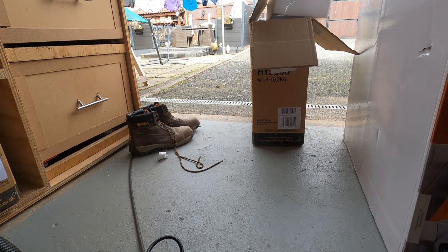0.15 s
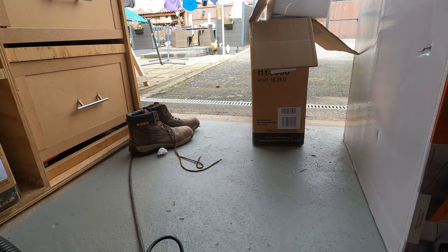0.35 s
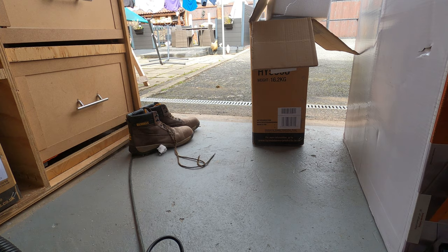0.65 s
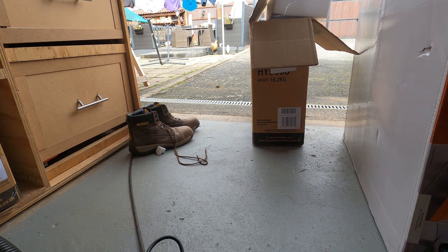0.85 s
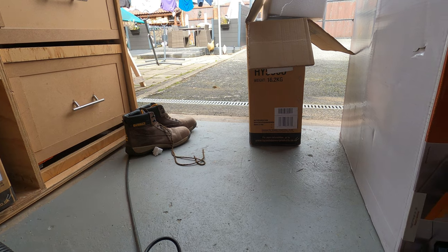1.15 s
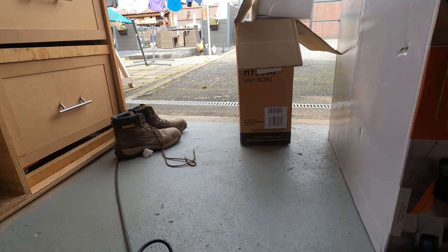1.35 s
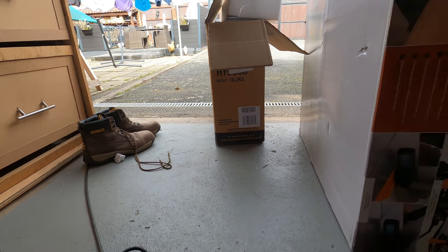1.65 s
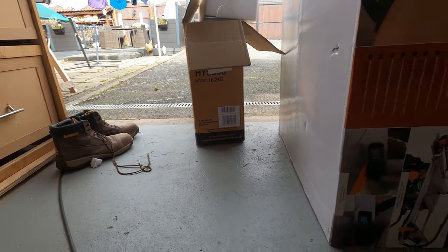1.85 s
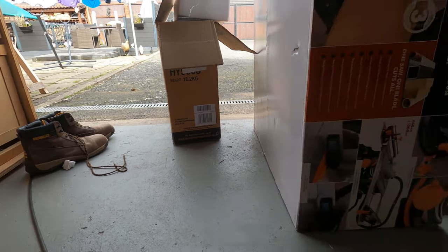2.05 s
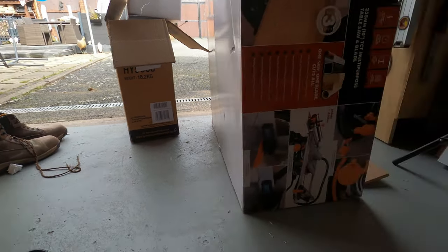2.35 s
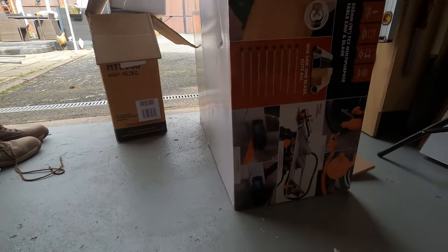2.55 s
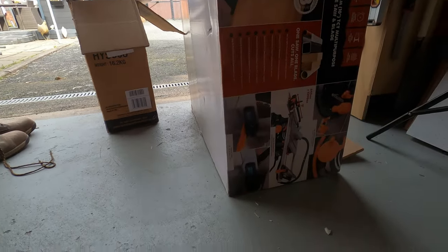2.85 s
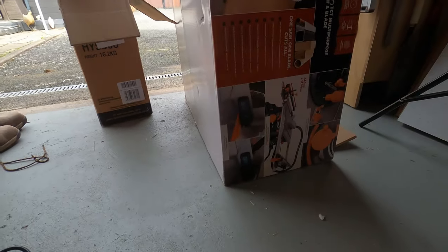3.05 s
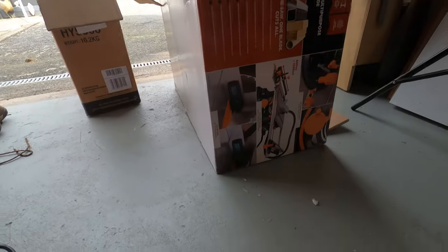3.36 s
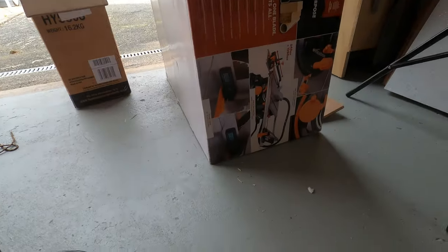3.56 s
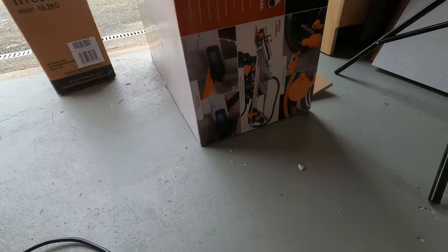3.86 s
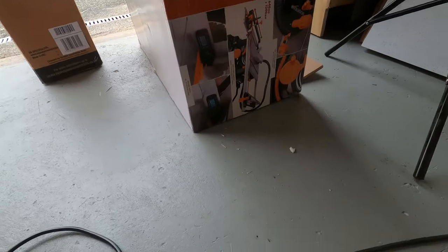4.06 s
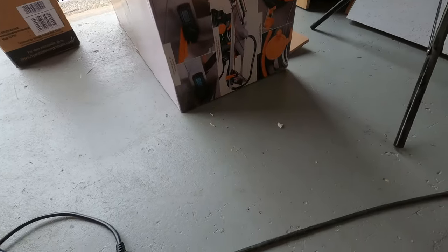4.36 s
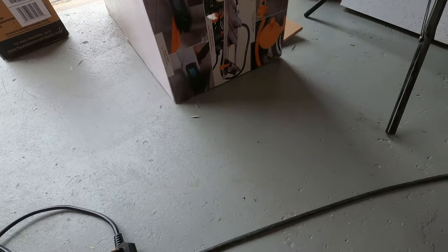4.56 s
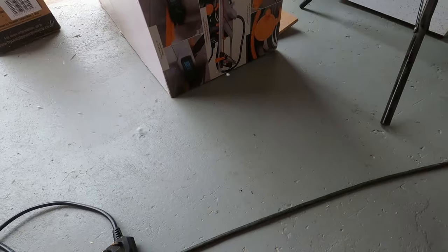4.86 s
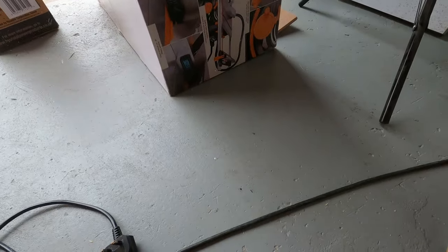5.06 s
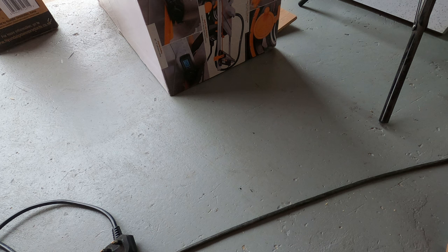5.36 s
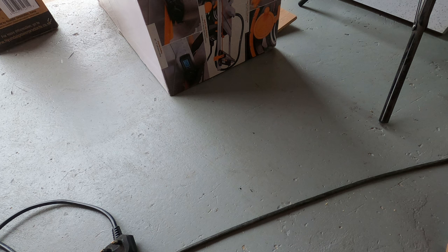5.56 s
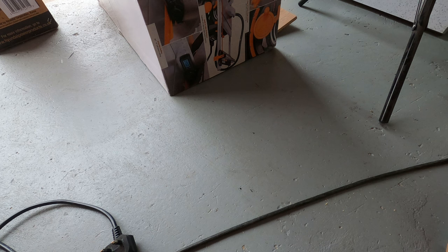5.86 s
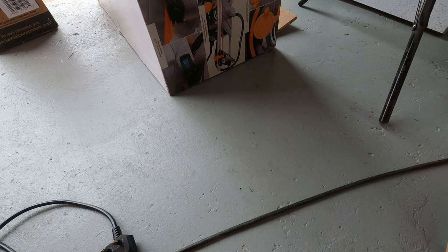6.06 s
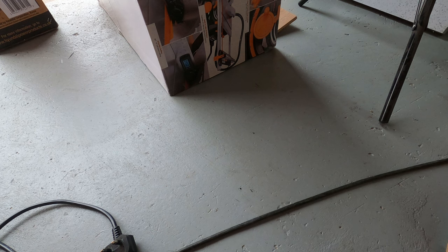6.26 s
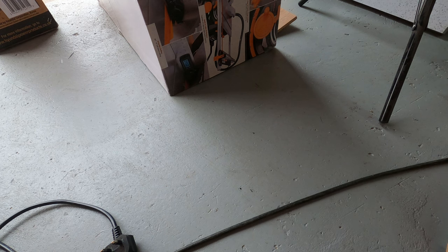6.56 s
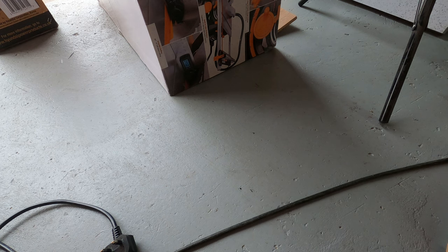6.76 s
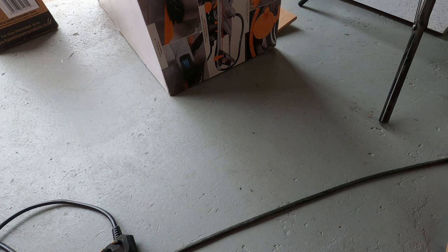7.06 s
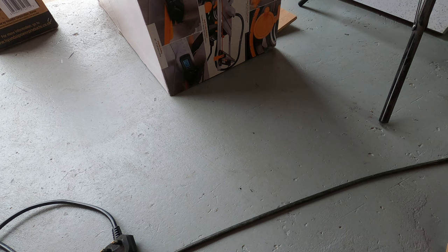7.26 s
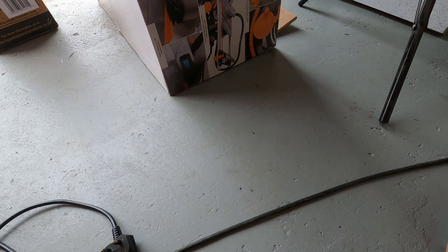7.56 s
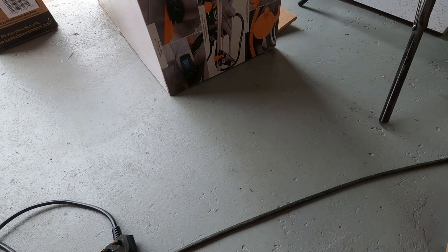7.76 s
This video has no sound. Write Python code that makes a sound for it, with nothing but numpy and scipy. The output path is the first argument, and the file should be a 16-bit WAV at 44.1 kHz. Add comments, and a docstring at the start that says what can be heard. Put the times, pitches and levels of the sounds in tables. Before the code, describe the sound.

A belt-driven air compressor runs continuously in a garage, a low steady hum with a gentle fast throb, buzzing pump strokes and faint metallic clatter. At about 0.1, 0.65 and 0.95 seconds, three bright air-gun blasts of under a fifth of a second hiss close by, each opening with a surge and buffeting the microphone; their thin top leans right. Around 2.3 to 2.6 seconds the microphone turns towards the machine, with a swelling low rumble and a cluster of small handling clicks, and the hum becomes clearly louder. The motor drones alone, with one tiny click near 3.9, until 4.7 seconds. Then come ten crisp short hisses, at roughly 4.7, 4.9, 5.5, 5.7, 6.25, 6.5, 6.9, 7.2, 7.4 and 7.6, with less buffeting and a little more room echo. The low-middle tank resonance slowly recedes. The hum continues to the end.

```python
"""Three short blasts of an air gun pass close to the microphone and buffet it, over the hum and throb of a
belt-driven air compressor in a garage. The microphone then turns towards the machine with a rumble and
handling clicks, the hum grows, and ten more blasts follow. The motor and pump strokes are sums of harmonics;
the clatter, jet and moving air are shaped noise; the clicks are short rings. A diffuse tail is the garage."""
import sys
import numpy as np
from scipy import signal
from scipy.fft import rfft, irfft
from scipy.io import wavfile
from scipy.ndimage import map_coordinates

SR = 44100
rng = np.random.default_rng(int(sys.argv[2]) if len(sys.argv) > 2 else 0)


def output_pcm(signal):
    """Save a mono or channel-first signal as 16-bit PCM at the path in sys.argv[1].

    Samples are clipped to [-1, 1] before scaling.
    """
    pcm = np.clip(np.atleast_2d(signal).T, -1, 1) * 32767
    wavfile.write(sys.argv[1], SR, np.round(pcm).astype(np.int16))


N = 348831
T = np.arange(N) / SR

BELT_HZ = 4.7525  # turns of the belt per second
PUMP_HZ, MOTOR_HZ = 5 * BELT_HZ, 10 * BELT_HZ  # pump strokes and motor turns per second
TURN_S = 2.41  # the microphone turns from the nearby nozzle to the machine
# Harmonics of the motor's hum: multiple of its turning rate, relative level/dB
MOTOR_TONES = [(1, -13), (2, 1.5), (3, -6.5), (4, -13.5), (5, -18), (6, -33), (7, -26.5), (8, -32),
               (9, -26.5), (10, -24), (11, -32), (12, -27)]


def amp(db):
    """Gain for a level in dB."""
    return 10 ** (np.asarray(db) / 20)


def unit(x):
    """The signal scaled to rms 1."""
    return x / np.sqrt(np.mean(x ** 2) + 1e-20)


def read(points, hz):
    """A table's value at hz, on a log-frequency axis."""
    f, value = np.transpose(points)
    return np.interp(np.log(hz + 1), np.log(f + 1), value)


def lift(resonances, hz):
    """dB that a set of resonances adds at hz."""
    return sum(db / (1 + (2 * (hz - f) / width) ** 2) for f, width, db in resonances)


def bins(size):
    """Frequencies in Hz of a real spectrum."""
    return np.fft.rfftfreq(size, 1 / SR)


def noise(spectrum, size, extra_db=0):
    """Noise of rms 1 with the given spectrum."""
    shape = amp(read(spectrum, bins(size)) + extra_db)
    return unit(irfft(rfft(rng.standard_normal(size)) * shape, size))


def drift(rate_hz, size):
    """Random wander of rms 1, no faster than about rate_hz."""
    shape = np.exp(-(bins(size) / rate_hz) ** 2)
    return unit(irfft(rfft(rng.standard_normal(size)) * shape, size))


def add(mix, s, sound):
    """Lay a sound into the mix from time s, cut off at the mix's end."""
    part = mix[round(s * SR):][:len(sound)]
    part += sound[:len(part)]


def garage(x, delay_s=0.0053):
    """The room's diffuse tail: noise that starts after a short gap, each band dying at its own speed."""
    # Reverberation of the garage: f/Hz, time to fall 60 dB/s
    decay_times = [(200, 0.4), (1500, 0.27), (4000, 0.29), (8000, 0.31), (15000, 0.22)]
    hz, t, z = signal.stft(rng.standard_normal(SR * 3 // 4), SR, nperseg=256)
    decay = amp(-60 * t / read(decay_times, hz)[:, None])
    tail = signal.istft(z * decay, SR, nperseg=256)[1]
    tail *= np.arange(len(tail)) > delay_s * SR
    return signal.fftconvolve(x, tail / np.linalg.norm(tail))[:N]


def nearness(hz):
    """Gain over time of the machine's sound at one frequency; the low middle comes from the tank."""
    # How near the machine is to the microphone: t/s, level/dB
    distance_levels = [(0.1, -4.5), (1.3, -7.5), (2.05, -2.5), (2.6, 3), (4.5, 1.14), (6.2, 0.66),
                       (7.0, -2.5), (7.8, 0)]
    # the tank stands out at first, then sinks as the microphone is lowered to the floor
    tank_db, sink_db, sink_from_s, sink_s = 1, 8.5, 4.22, 1.94
    sunk = 1 - np.exp(-np.maximum(T - sink_from_s, 0) / sink_s)
    tank_share = np.interp(np.log(hz), np.log([100, 400, 900]), [0, 1, 0])
    machine_db = np.interp(T, *np.transpose(distance_levels))
    return amp(machine_db + tank_share * (tank_db - sink_db * sunk))


def clatter(level_db=-49, stroke_depth=0.056, patter=0.089):
    """Valves and cooling air: noise rippling at multiples of the stroke rate, ringing in tank and pump head."""
    # Noise of the machine: f/Hz, relative level per Hz/dB
    clatter_spectrum = [(15, -42), (25, -19), (43, -20), (79, -8), (107, -3.5), (215, -15.5), (274, -25),
                        (421, -20), (567, -30), (631, -29), (895, -30.5), (1530, -34.5), (4380, -43),
                        (11800, -54.5), (15500, -69)]
    # Ringing of the tank and pump head: f/Hz, width/Hz, lift/dB
    shell = [(321, 42, 7.5), (394, 45, 4), (1020, 380, 4), (1346, 56, 8), (1760, 91, 4.5),
             (3020, 1600, 3.5), (4300, 540, 5), (7450, 260, 5.5), (9200, 450, 3.5)]
    hz = bins(N)
    strokes = sum(np.cos(2 * np.pi * (k * PUMP_HZ * T + rng.random())) for k in range(3, 7))
    swell = 1 + stroke_depth * strokes + patter * drift(27, N)
    z = rfft(noise(clatter_spectrum, N, lift(shell, hz)) * swell)
    z /= np.std(irfft(z * (hz > 1200), N))  # the level is that of the part above 1200 Hz
    # three overlapping bands, each with its own nearness
    centres = [100, 400, 900]
    bands = [irfft(z * np.interp(hz, centres, row), N) * nearness(f) for f, row in zip(centres, np.eye(3))]
    return amp(level_db) * sum(bands)


def hum(level_db=-27, waver=0.1, slip_s=.00008):
    """The motor's harmonics; the belt's uneven pull sets side tones beside them, which throb twice a belt turn."""
    # Standing waves of the garage that lift the side tones: f/Hz, width/Hz, lift/dB
    boom = [(104.5, 5.7, 11.5), (199.6, 7.1, 16.5)]
    throb_db, throb_follow = -18.5, 0.41  # the throb deepens as the tank gets louder
    limp_db = -10  # a further side tone makes every other throb stronger
    belt_mark_s = 2.917  # the phases of the tones and side tones are counted from here
    t = T - belt_mark_s + slip_s * drift(2.8, N)
    throb = amp(throb_db) * nearness(400) ** throb_follow
    out = np.zeros(N)
    for multiple, db in MOTOR_TONES:
        hz, start = np.round(multiple) * MOTOR_HZ, rng.random()
        tone = np.cos(2 * np.pi * (hz * t + start))
        for step, share in [(-2, -1), (2, 1), (3, amp(limp_db))]:  # step in belt turns
            side_hz = hz + step * BELT_HZ
            side_tone = np.cos(2 * np.pi * (side_hz * t + start))
            tone += share * throb * amp(lift(boom, side_hz)) * side_tone
        out += amp(level_db + db) * nearness(hz) * (1 + waver * drift(5.6, N)) * tone
    return np.sqrt(2) * out


def buzz(level_db=0, flutter=0.34, slip_s=.00008, count=60):
    """Harmonics of the pump's strokes fill in between and above the motor's tones, each fluttering a little."""
    # Level of the stroke harmonics: f/Hz, level/dB
    buzz_levels = [(70, -69), (120, -45.5), (240, -70), (320, -58), (450, -60), (590, -73), (720, -63),
                   (1020, -58.5), (1130, -74), (1340, -71.5), (2000, -72)]
    # Sharp rings of the casing that pick out single harmonics: f/Hz, width/Hz, lift/dB
    casing = [(309, 12, 6), (760, 12, 4.5), (903, 12, 2.5), (974, 12, 4.5), (1069, 8.8, 10)]
    t = T + slip_s * drift(1.8, N)
    flutters = [drift(4.9, N) for _ in range(7)]
    out = np.zeros(N)
    for k in range(3, count):
        if k % 2 or k > 2 * len(MOTOR_TONES):  # even ones below this are the motor's
            hz = k * PUMP_HZ
            tone = np.cos(2 * np.pi * (hz * t + rng.random()))
            wobble = 1 + flutter * flutters[k % len(flutters)]
            out += amp(read(buzz_levels, hz) + lift(casing, hz)) * nearness(hz) * wobble * tone
    return np.sqrt(2) * amp(level_db) * out


def handling(click_db=-7, tick_s=0.0061, ring_db=13, ring_width=0.19):
    """The turning microphone rumbles in the air, and its housing clicks as short decaying rings."""
    # Small handling clicks: t/s, relative level/dB, ring f/Hz
    click_events = [(0.531, -39, 3640), (2.258, -35, 6500), (2.283, -33, 6000), (2.336, -23.5, 3600),
                    (2.372, -29, 5000), (2.407, -27.5, 3200), (2.43, -23.5, 3420), (2.458, -21, 2100),
                    (2.46, -21.5, 5260), (2.615, -26, 2800), (3.863, -29.5, 3750), (6.83, -22.5, 2920)]
    # Ringing of the microphone's housing: f/Hz, width/Hz, lift/dB
    housing = [(2120, 350, 8), (3800, 460, 0), (5600, 700, 1.5)]
    # Rumble of the turning microphone: f/Hz, relative level per Hz/dB
    rumble_spectrum = [(12, -14), (35, 7), (70, 8.5), (125, 9), (190, 2), (280, -8), (450, -12),
                       (800, -19.5), (2000, -31), (6000, -55)]
    clicks, size = np.zeros(N), 4096
    t, hz = np.arange(size) / SR, bins(size)
    tick_spectrum = [(400, -4), (1500, 10.5), (6000, -2.0), (9000, -7.5), (15000, -31)]
    for s, db, ring_hz in click_events:
        ring = ring_db / (1 + ((hz / ring_hz - 1) / ring_width) ** 2)
        tick = noise(tick_spectrum, size, ring + lift(housing, hz))
        add(clicks, s, amp(db + click_db) * tick * np.exp(-t / tick_s))
    # the rumble swells to a peak at the turn and dies away
    peak_db, rise_db_per_s, fall_db_per_s = -18.5, 49, 47
    swell_db = peak_db - np.maximum(rise_db_per_s * (TURN_S - T), fall_db_per_s * (T - TURN_S))
    return clicks, amp(swell_db) * noise(rumble_spectrum, N)


def valve(t, length, open_s, close_s):
    """Air flow through the trigger valve: half open at t = 0 and half shut after length."""
    return (1 + np.tanh(t / open_s)) * (1 + np.tanh((length - t) / close_s)) / 4


def bounce(x, echo=0.13, sweep_s=0.00018, longest_s=.005, count=5):
    """Echoes off the floor and nearby things comb the hiss; the comb slides as the hand moves."""
    n = np.arange(len(x))
    out = x.copy()
    for delay, speed in zip(rng.uniform(0.000376, longest_s, count), rng.standard_normal(count)):
        at = n - SR * (delay + sweep_s * speed * n / len(x))
        out += echo * map_coordinates(x, [at], order=3, mode="wrap")
    return unit(out)


def air_gun(fizz_db=0, draught_db=-2, push_db=20.5, kick=0.77, kick_s=0.02, push_s=0.003, flicker=0.082):
    """Each blast is jet hiss with an opening surge, and a push of air as the valve opens and shuts."""
    # Blasts: trigger pulled t/s, released t/s, hiss level/dB, brightness/dB per threefold f,
    # relative draught level on the microphone/dB, relative fizz level/dB
    blasts = [(0.111, 0.263, -20, 5, -40, -30.5), (0.659, 0.829, -19.5, 2.2, -20.5, -34.5),
              (0.947, 1.081, -20.5, 1, -31, -31.5), (4.683, 4.775, -21.7, 4.5, -26, -27.5),
              (4.924, 5.035, -22, 4, -33, -38), (5.468, 5.574, -21, 4, -23.5, -65),
              (5.67, 5.769, -22, 2.5, -26.5, -64), (6.248, 6.382, -21.7, 5.5, -26.5, -47),
              (6.535, 6.678, -22, 5, -30, -64), (6.89, 7.04, -22, 5, -34, -60),
              (7.186, 7.309, -22, 5.5, -32, -60), (7.412, 7.553, -22, 5, -29.5, -46),
              (7.633, 7.772, -22, 5.5, -30.5, -61)]
    # The jet: f/Hz, relative level per Hz/dB
    jet_spectrum = [(300, -18), (700, -17), (1200, -7), (2200, -1), (3500, 1.5), (5000, -2), (7200, -4),
                    (7900, -8), (8700, -4), (10200, -12), (12200, -19), (13200, -25.5), (15500, -53)]
    # Core of the jet, which sings out when the nozzle is close: f/Hz, width/Hz, lift/dB
    jet_core = [(4300, 1100, 2.5)]
    # The jet's thin top, strong in the first four blasts and fainter in the others:
    # f/Hz, relative level per Hz/dB
    fizz_spectrum = [(7000, -21), (10500, -9), (12400, 2.5), (14000, -4), (15700, -3)]
    # Rush of air striking near the microphone: f/Hz, relative level per Hz/dB
    rush_spectrum = [(40, -32), (150, 4.5), (300, 1), (550, -4), (1200, -4), (3000, -36), (8000, -47)]
    # Moving air on the microphone: f/Hz, relative level per Hz/dB
    draught_spectrum = [(10, 2), (28, -4), (55, 1.5), (120, -7), (200, -8.5), (350, -24.5), (1000, -40)]
    rush_close_db, rush_far_db = -32.5, -55  # before and after the turn
    hiss, fizz, wind = np.zeros((3, N))
    size, lead = 16384, .04  # samples per blast; seconds kept ahead of the trigger
    t, hz = np.arange(size) / SR - lead, bins(size)
    slope = np.clip(np.log(np.maximum(hz, 1) / 4500) / np.log(3), -.7, .6)
    for start, end, db, bright_db, draught, top in blasts:
        close, length = start < TURN_S, end - start
        rush = rush_close_db if close else rush_far_db
        flow = valve(t, length, open_s=0.012, close_s=0.0061)
        surge = 1 + kick * np.exp(-np.maximum(t, 0) / kick_s) * (t > 0)
        flow *= surge * (1 + flicker * drift(89, size))
        colour_db = bright_db * slope + close * lift(jet_core, hz)
        add(hiss, start - lead, amp(db) * flow * bounce(noise(jet_spectrum, size, colour_db)))
        add(hiss, start - lead, amp(rush) * flow * noise(rush_spectrum, size))
        add(fizz, start - lead, amp(top + fizz_db) * flow * bounce(noise(fizz_spectrum, size)))
        # the pushes trail the trigger by a few milliseconds
        opens, shuts = (t - .007) / push_s, (t - length - .008) / (1.5 * push_s)
        push = 2 * opens * np.exp(-opens ** 2) - shuts * np.exp(-shuts ** 2)
        draught_air = amp(draught + draught_db) * flow * noise(draught_spectrum, size)
        add(wind, start - lead, draught_air + amp(rush + push_db) * push)
    return hiss, fizz, wind


def scene(fizz_left_db=-8, fizz_right_db=2, fizz_room_db=-7):
    """Everything is centred except the direct fizz of the blasts, which lies to the right."""
    room_close_db, room_far_db = -13.5, -9  # the room is stronger after the turn
    hiss, fizz, wind = air_gun()
    clicks, rumble = handling()
    room = garage(amp(np.where(T < TURN_S, room_close_db, room_far_db)) * (hiss + clicks))
    centre = hum() + buzz() + clatter() + hiss + wind + clicks + rumble + room
    centre += amp(fizz_room_db) * garage(fizz)
    return np.array([centre + amp(db) * fizz for db in (fizz_left_db, fizz_right_db)])


def record(dry):
    """The recorder's band limit: a steep low-pass filter."""
    edge_hz = 15750
    low_pass = signal.firwin(601, edge_hz, window=("kaiser", 9), fs=SR)
    return signal.oaconvolve(dry, low_pass[None], "same", axes=1)


dry = scene()
out = record(dry)
output_pcm(out)
```